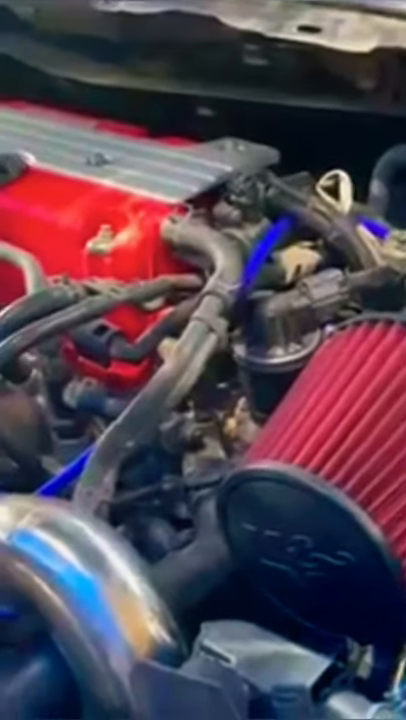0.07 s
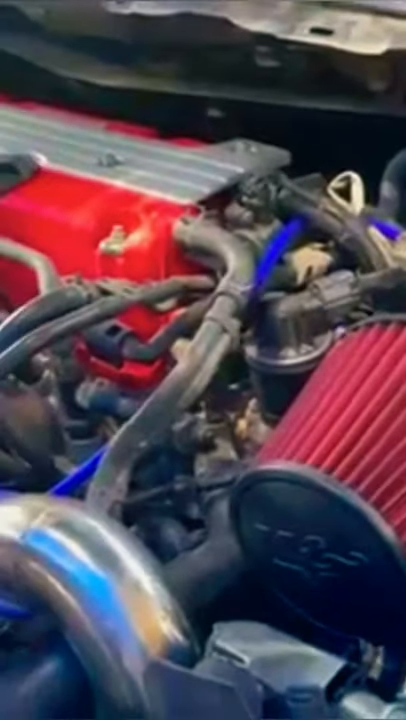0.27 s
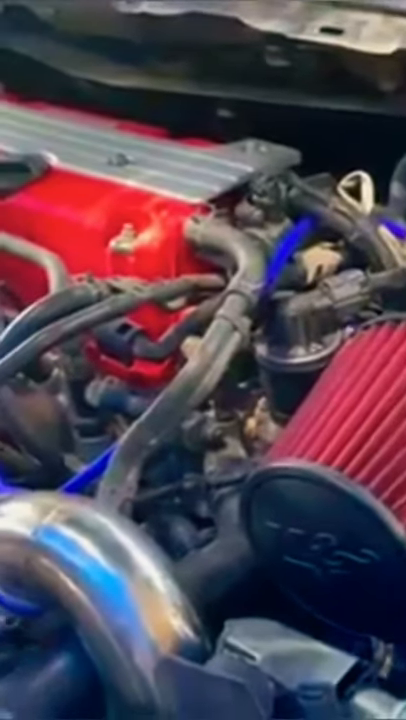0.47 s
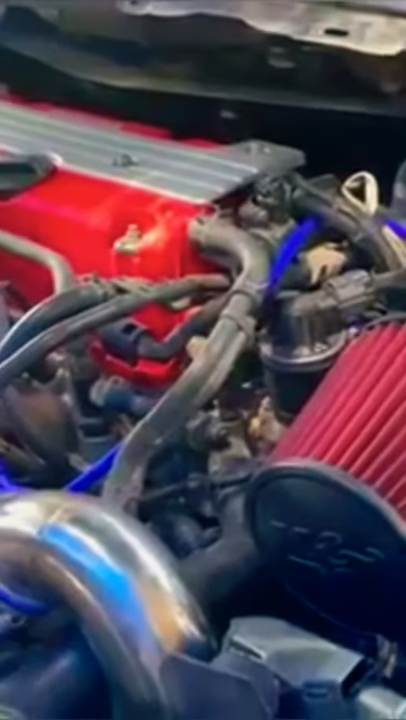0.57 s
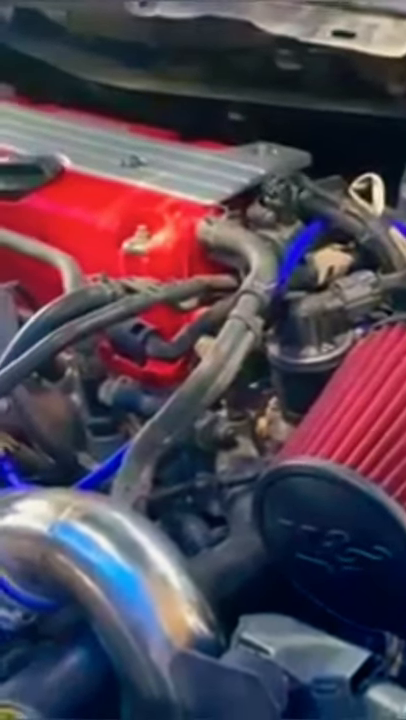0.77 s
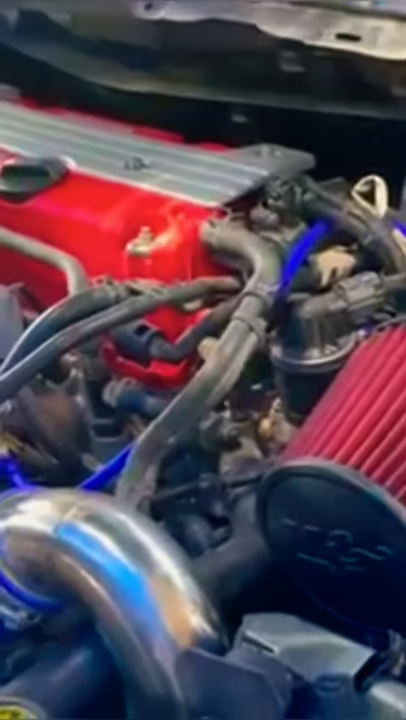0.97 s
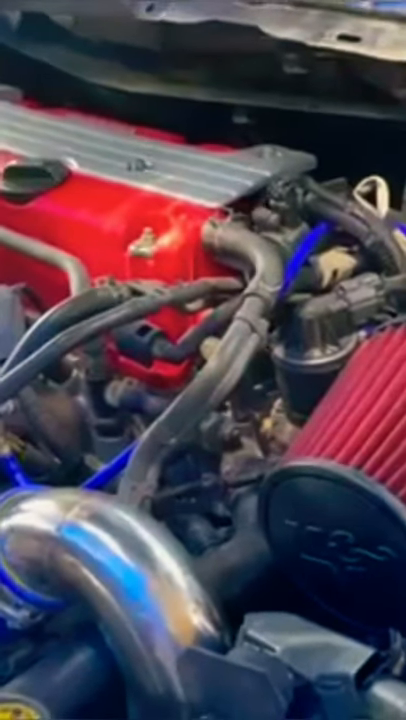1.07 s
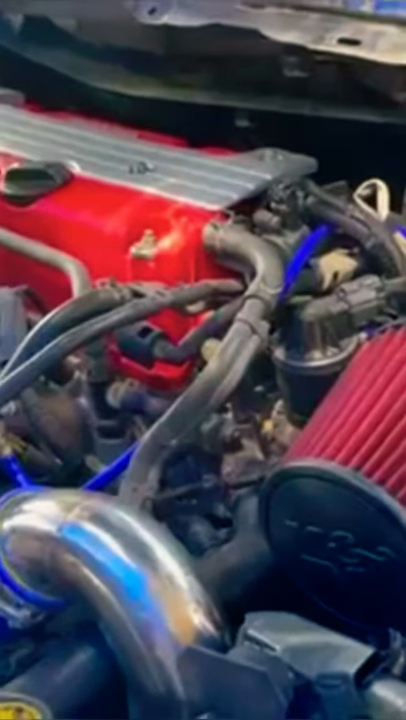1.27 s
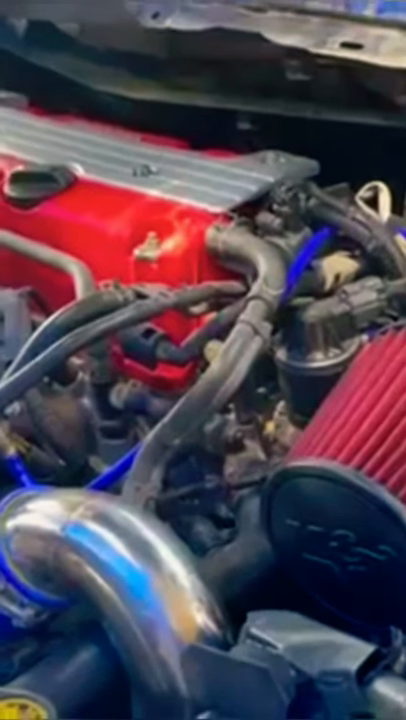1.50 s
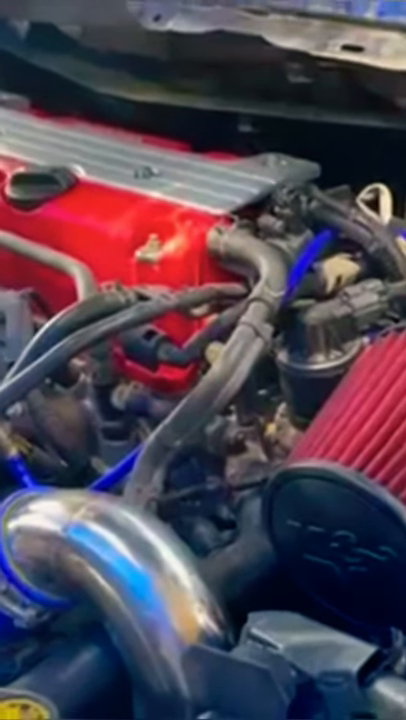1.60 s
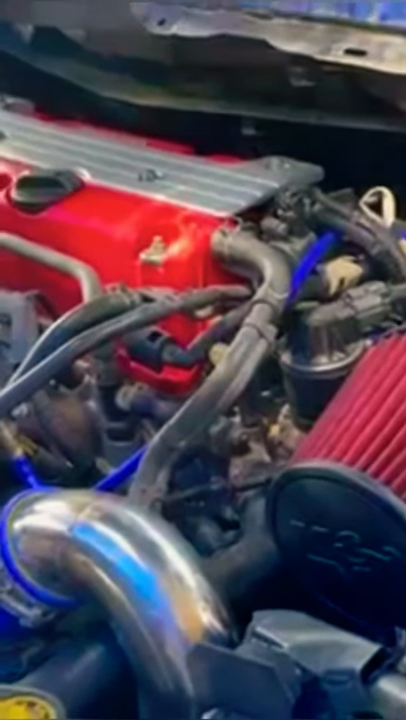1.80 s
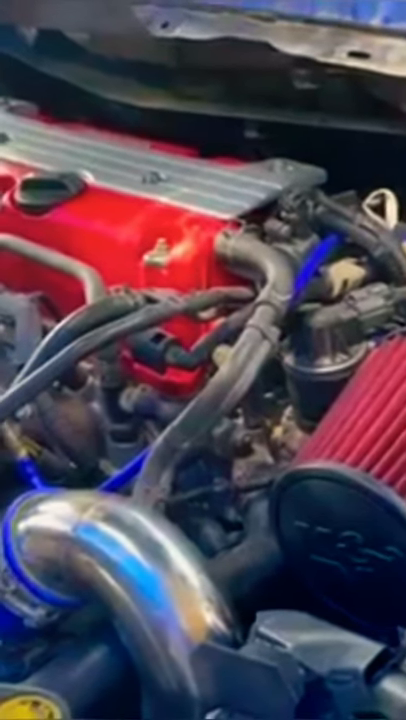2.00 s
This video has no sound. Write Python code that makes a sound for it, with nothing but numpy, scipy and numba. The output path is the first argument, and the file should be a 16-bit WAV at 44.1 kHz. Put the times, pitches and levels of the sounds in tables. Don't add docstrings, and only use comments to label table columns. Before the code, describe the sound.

A turbocharged car engine is blipped from idle, its intake growl and airy turbo rush climbing until the throttle snaps shut, a blow-off valve spits and hoots, and the revs sink; close phone microphone, open engine bay.

```python
import sys
import numpy as np
from scipy import signal
from scipy.fft import rfft, irfft
from scipy.io import wavfile
from scipy.ndimage import uniform_filter1d
from numba import njit

SR = 44100
rng = np.random.default_rng(int(sys.argv[2]) if len(sys.argv) > 2 else 0)


def generate_wav(signal):
    frames = np.transpose(np.atleast_2d(signal))
    scaled = np.clip(frames, -1, 1) * 32767
    pcm = np.round(scaled).astype(np.int16)
    wavfile.write(sys.argv[1], SR, pcm)


def gain_from_db(level_db):
    decades = np.asarray(level_db, float) / 20
    return 10 ** decades


N = 90404
OPEN_S, SHUT_S = 0.18, 0.88


def across(table, hz):
    table = np.array(table, float)
    return np.interp(np.log(hz + 1), np.log(table[:, 0] + 1), table[:, 1])


def over_time(t, table):
    return np.interp(t, *np.array(table, float).T)


def colour(x, gain):
    return irfft(rfft(x) * gain(np.fft.rfftfreq(N, 1 / SR)), N)


def unit(x):
    return x / np.sqrt(np.mean(x ** 2))


def hiss():
    return rng.standard_normal((2, N))


def noise(gain):
    return unit(colour(rng.standard_normal(N), gain))


def walk(rate):
    k = int(SR / rate)
    levels = np.repeat(rng.standard_normal(N // k + 1), k)
    return 1.38 * uniform_filter1d(uniform_filter1d(levels, k), k)[:N]


def shape(t, start, attack, hold, release):
    rise = np.clip((t - start) / attack, 0, 1)
    return rise * np.exp(-np.maximum(t - start - attack - hold, 0) / release)


@njit
def svf(x, hz, width):
    y, band, low = np.empty(len(x)), 0., 0.
    for i in range(len(x)):
        g, k = np.tan(np.pi * hz[i] / SR), width / hz[i]
        v = (band + g * (x[i] - low)) / (1 + g * (g + k))
        band, low, y[i] = 2 * v - band, low + 2 * g * v, k * v
    return y


def rumble(t):
    db = -36 + 6.5 * shape(t, 0.598, 0.16, 0.14, .01)
    db = db - 7 * np.clip((t - 1.1) / 0.15, 0, 1)
    level = gain_from_db(db + 2.3 * walk(10.5))
    return level * noise(lambda f: f ** 4 / (f ** 4 + 60 ** 4) / (1 + (f / 119) ** 2))


def exhaust(t, turns, hz):
    # time in s, level of the firing tone in dB.
    firing_tone = [(0.0, -29.5), (0.2, -39.5), (0.45, -22.5), (0.508, -26.5), (0.6, -17.5), (0.66, -12.5),
                   (0.715, -15), (0.76, -31.5), (0.85, -18.5), (0.9, -37), (1.2, -35), (1.31, -29.5),
                   (1.42, -20), (1.5, -28), (1.58, -20.5), (1.75, -26.5), (1.89, -31.5), (2.05, -29.5)]
    # frequency in Hz, overtone level in dB relative to the firing tone.
    tailpipe = [(160, -10), (178, -13), (198, -32), (228, -18), (255, -22), (275, -31), (300, -18),
                (322, -34)]
    overtones = 0
    for k in range(2, 5):
        level = gain_from_db(across(tailpipe, k * hz) + 0.99 * walk(13.68))
        overtones = overtones + level * np.sin(2 * np.pi * k * turns)
    note = np.sin(2 * np.pi * turns) + (t > SHUT_S) * overtones
    tone_db = uniform_filter1d(over_time(t, firing_tone), size=900)
    return np.sqrt(2) * gain_from_db(tone_db + 0.6 * walk(30.1)) * note


def intake(t, turns, hz):
    # resonance in Hz, width in Hz, level in dB.
    resonances = [(133, 63, 3), (231, 51, -6.5), (288, 102, -11.5), (382, 35, -1.5), (420, 53, -15)]
    f = np.arange(1, 4000.)
    tract = 0
    for k, (centre, width, db) in enumerate(resonances):
        tract = tract + (-1) ** k * gain_from_db(db) / (1 + 1j * (f ** 2 - centre ** 2) / f / width)
    idle_dull_hz = 240
    nearly_shut = np.clip((OPEN_S + 0.045 - t) / 0.041, 0, 1)
    ring = 0
    for order in np.arange(1.5, 10.5, .5):
        half_order_db = -14 * (order % 1 > 0)
        db = half_order_db - 1.5 * (order - 2) + 0.61 * np.sqrt(order) * walk(29.05)
        db = db - 14 * nearly_shut * (order * hz > idle_dull_hz)
        cycles = order * turns + 0.028 * order * walk(39.85)
        response = np.interp(order * hz, f, tract)
        ring = ring + gain_from_db(db) * np.real(response * np.exp(2j * np.pi * cycles))
    plate_db = np.interp(t, [OPEN_S, OPEN_S + 0.14, SHUT_S, SHUT_S + 0.0067], [-20.5, 0, 0, -38])
    return np.sqrt(2) * ring * gain_from_db(-18.5 + plate_db)


def air(t, turns, flow_db):
    # frequency in Hz, level on boost in dB per Hz.
    rush = [(240, -15), (400, 3), (547, -14.5), (748, -1), (4690, -16.5), (5730, -10), (9970, -16),
            (11000, -1), (12000, -25), (15600, -65), (22000, -120)]
    # frequency in Hz, level on the overrun in dB per Hz.
    coast = [(250, -11), (340, -6.5), (600, -11), (850, 0), (1660, -5.5), (4000, -7.5), (5500, -13),
             (11800, -8.5)]
    boost = np.interp(t, [OPEN_S, .4, .75, .95, .97], [0.24, 0.46, 0.98, 0.9, 0])
    shutting = shape(t, SHUT_S, 0.0025, 0.066, .02)
    idling = np.clip((OPEN_S + 0.024 - t) / 0.065, 0, 1)
    out, swell = 0, walk(12.35)
    for hz in 250 * 2 ** np.arange(0, 5.7, 1 / 3):
        band = unit(colour(hiss(), lambda f: np.exp(-(np.log2(f / hz + 1e-9) * 4.14) ** 2)))
        rush_db = across(rush, hz) - across(rush, 4060.0) + 1
        coast_db = across(coast, hz) - across(coast, 4060.0) + 2.5
        bandwidth_db = 10 * np.log10(hz * 0.22 / 10200.0)
        db = boost * rush_db + (1 - boost) * coast_db + bandwidth_db
        db = db - 11 * shutting / (1 + (hz / 1140) ** 4)
        db = db - 4 * idling / (1 + (hz / 650) ** 6)
        out = out + band * gain_from_db(db + 1.4 * walk(31.9) + 0.42 * swell)
    return out * gain_from_db(flow_db) * (1 + 0.1 * np.cos(2 * np.pi * turns))


def spool(t, flow_db, path, width_hz):
    time, centre_hz, level_db = np.array(path, float).T
    hz, width = np.interp(t, time, centre_hz), 1. * width_hz
    band = np.array([svf(svf(v, hz, width), hz, width) for v in hiss()])
    silent = (t < time[0]) | (t > time[-1] + .35)
    db = flow_db + np.interp(t, time, level_db) - 60 * silent
    return unit(band) * gain_from_db(db + 2.04 * walk(44.5))


def puffs(t):
    # start in s, length in s, level in dB, top frequency in Hz.
    thuds = [
        (.911, 0.023, -15, 520),
        (.926, 0.0062, -21, 460),
        (.912, 0.0123, -18, 220),
        (.936, 0.012, -23, 240),
        (.998, 0.079, -43, 114),
        (0.68, 0.013, -23, 230),
    ]
    out = 0
    for start, length, db, top_hz in thuds:
        thud = noise(lambda f: f ** 2 / (f ** 2 + 55 ** 2) / np.sqrt(f + 80) / (1 + (f / top_hz) ** 4))
        out = out + gain_from_db(db) * thud * shape(t, start, 0.0031, length, 0.002)
    return out


def breath(hz, width):
    return unit(colour(hiss(), lambda f: 1 / (1 + ((f - hz) / width) ** 2)))


def spit(t):
    jet = unit(colour(hiss(), lambda f: f / (f + 1500) / (1 + (f / 7000) ** 2) ** 0.22))
    return gain_from_db(-14.5) * jet * shape(t, 0.882, 0.0071, 0.014, 0.0048)


def hoot(t):
    start, level_db = 0.897, -12
    hz = 1240 - 5100 * np.clip(t - start, 0, .045) + 45 * walk(300)
    phase = 2 * np.pi * np.cumsum(hz) / SR
    rough_level = gain_from_db(2.0 * walk(260) - 220 * np.abs(t - start - .016))
    out = rough_level * np.sin(phase) * shape(t, start, 0.019, 0.028, 0.0065)
    out = out + gain_from_db(-13.5) * breath(2128, 47) * shape(t, .916, .004, 0.021, .008)
    out = out + gain_from_db(-10.5) * breath(1080, 160) * shape(t, start, 0.0088, 0.044, 0.0088)
    chuff = breath(1760, 1000) * shape(t, .892, 0.0033, 0.029, 0.0044)
    out = out + gain_from_db(-28 - level_db) * chuff
    return np.sqrt(2) * gain_from_db(level_db) * out


def leak(t):
    start, flutter_hz = 0.96, 17.02
    out = breath(5960, 2200) * shape(t, start, 0.023, 0.082, 0.33)
    return gain_from_db(-29) * out * (1 + 0.087 * np.sin(2 * np.pi * flutter_hz * (t - start)))


def scene():
    # time in s, firing rate in Hz.
    speed = [(0.0, 47.85), (0.15, 46.53), (0.2, 47.75), (0.3, 62.65), (0.48, 94.57), (0.56, 113.1),
             (0.62, 124.2), (0.71, 141.7), (0.87, 169), (0.97, 170.6), (1.04, 161.8), (1.09, 154.4),
             (1.17, 142), (1.45, 122), (1.62, 107.8), (1.65, 106.5), (2.0, 81.3), (2.05, 80.06)]
    # time in s, air flow level in dB.
    flow = [(0.0, -41.5), (0.15, -44), (0.22, -35), (0.27, -40), (0.66, -27.5), (0.88, -23), (0.89, -20.5),
            (0.93, -26.5), (0.97, -32), (1.0, -30), (1.07, -32), (1.28, -37), (1.57, -34.5), (2.05, -42.5)]
    # time in s, centre in Hz, level over the flow in dB.
    blades = [(0.449, 4403, -19), (.6, 6400, -32), (0.682, 8430, 1.5), (.8, 11000, -1), (.9, 11100, -0.5),
              (1.1, 11190, 5), (1.4, 10840, -0.5), (1.7, 11230, -9.5)]
    # time in s, centre in Hz, level over the flow in dB.
    tips = [(.5, 10200, -33), (.535, 10600, 3), (.56, 11300, -6), (.62, 11200, -12.5), (.7, 11200, -17),
            (.76, 11100, -28)]
    # frequency in Hz, side level relative to mid in dB.
    side_db = [(100, -62), (200, -89), (330, -11.5), (640, 0.5), (1200, -16.5), (3000, -2.5), (8000, -2.5),
               (12000, -3.5)]
    # frequency in Hz, share of mid leaking into side (a ratio).
    lean = [(200, 0), (350, 0.2), (640, -0.53), (1160, -0.2), (2000, -0.014)]
    # low edge in Hz, high edge in Hz.
    alike = [(1500, 2050), (5650, 6900), (11700, 12500)]
    t = np.arange(N) / SR
    hz, flow_db = over_time(t, speed), over_time(t, flow)
    turns = np.cumsum(hz) / SR
    low_end = exhaust(t, turns, hz) + rumble(t) + puffs(t)
    wide = air(t, turns, flow_db) + intake(t, turns, hz)
    wide = wide + spool(t, flow_db, blades, width_hz=1900) + spool(t, flow_db, tips, width_hz=1500)
    mid, side = wide + spit(t) + hoot(t) + leak(t)
    side = colour(np.roll(side, 60), lambda f: gain_from_db(across(side_db, f)))
    side = side + colour(mid, lambda f: across(lean, f))
    side = colour(side, lambda f: 1 - sum((f > lo) & (f < hi) for lo, hi in alike))
    mid = mid + low_end
    return np.array([mid + side, mid - side])


def starve(mid):
    # low edge in Hz, high edge in Hz, number of slices, readiness to drop from 0 to 2.
    starved = [(2400, 3600, 6, .1), (6600, 7000, 2, .4), (7700, 10300, 4, .35)]
    rate = 34
    for lo, hi, slices, readiness in starved:
        edges, shared = np.linspace(lo, hi, slices + 1), walk(rate)
        for a, b in zip(edges, edges[1:]):
            hunger = .5 * shared + .85 * walk(rate) + readiness - 1.5
            mid = mid - np.clip(2 * hunger, 0, 1) * colour(mid, lambda f: (f > a) & (f <= b))
    return mid


def empty_bands(mid):
    # start in s, end in s, low edge in Hz, high edge in Hz.
    gaps = [(0, .135, 4750, 5150), (.06, .09, 4450, 4750), (.2, .23, 4450, 4750), (.32, .345, 4750, 5150),
            (.43, .475, 4750, 5150), (.56, .6, 4300, 5150), (.79, .855, 4250, 4750), (.92, .97, 4300, 5150),
            (1.08, 1.15, 4750, 5150), (1.19, 1.525, 4750, 5150), (1.57, 1.7, 4750, 5150),
            (1.73, 1.88, 4750, 5150), (1.97, 2.015, 4250, 5150), (1.5, 1.525, 4450, 4750),
            (.02, .045, 9100, 10300), (.085, .265, 9750, 10300), (.14, .19, 9100, 9750),
            (.175, .21, 7700, 8800), (.27, .295, 7700, 8200), (.35, .41, 9000, 9650),
            (.37, .43, 7700, 9000), (.53, .57, 8200, 9750), (.53, .64, 7700, 8200), (.53, .67, 9750, 10300),
            (.76, .87, 9750, 10300), (.78, .8, 9200, 9750), (.855, .895, 8200, 8900),
            (.855, .94, 7700, 8200), (.98, 1.01, 9750, 10300), (1.04, 1.09, 7700, 8800),
            (1.06, 1.13, 8600, 9750), (1.11, 1.19, 9750, 10300), (1.44, 1.53, 7700, 8200),
            (1.48, 1.525, 8200, 9750), (1.51, 1.535, 9750, 10300), (1.67, 1.69, 9750, 10300),
            (1.73, 1.78, 9100, 9750), (1.74, 2.05, 9750, 10300), (1.82, 1.87, 7700, 9100),
            (1.83, 1.92, 9100, 9750), (.41, .6, 11750, 12000), (.67, .8, 11650, 12000),
            (.93, 1.2, 11750, 12000), (1.47, 2.05, 11700, 12000)]
    edge_s, pad_s, pad_hz = .012, .011, 50
    t = np.arange(N) / SR
    f, spectrum = np.fft.rfftfreq(N, 1 / SR), rfft(mid)
    edges = sorted({hz for row in gaps for hz in (row[2] - pad_hz, row[3] + pad_hz)})
    for a, b in zip(edges, edges[1:]):
        empty = np.zeros(N)
        for start, end, lo, hi in gaps:
            if lo - pad_hz <= a and b <= hi + pad_hz:
                inside_s = np.minimum(t - start, end - t) + pad_s
                empty = empty + np.clip(inside_s / edge_s + 1, 0, 1)
        fade = np.sin(np.pi / 2 * np.clip(empty, 0, 1)) ** 2
        mid = mid - fade * irfft(spectrum * ((f > a) & (f <= b)), N)
    return mid


def roll_off(x):
    return signal.sosfilt(signal.butter(12, 12970, fs=SR, output="sos"), x)


def record(dry):
    rounded = dry / (1 + (dry / .97) ** 4) ** .25
    left, right = colour(rounded, lambda f: f < 11950)
    mid, side = (left + right) / 2, (left - right) / 2
    mid = empty_bands(starve(mid))
    return roll_off(np.array([mid + side, mid - side]))


dry = scene()
out = record(dry)
generate_wav(out)
```